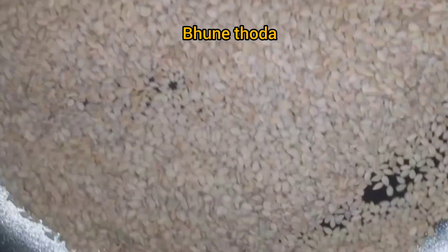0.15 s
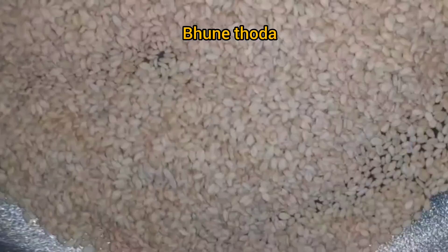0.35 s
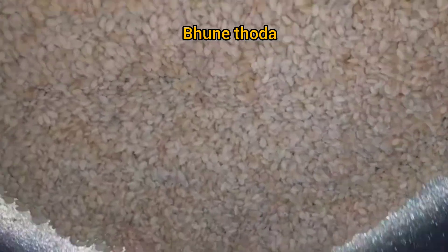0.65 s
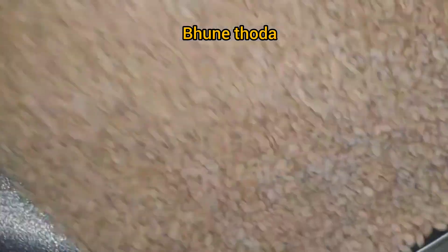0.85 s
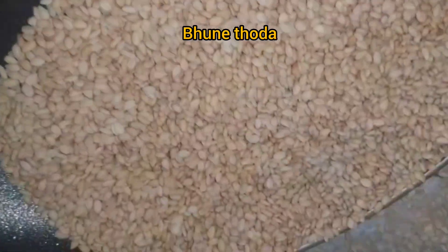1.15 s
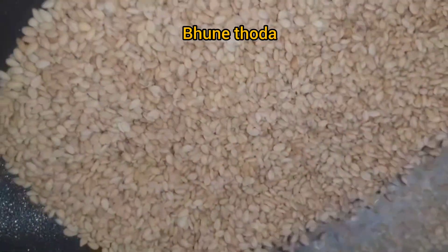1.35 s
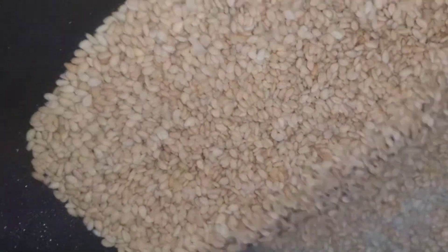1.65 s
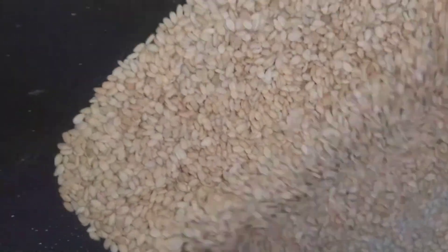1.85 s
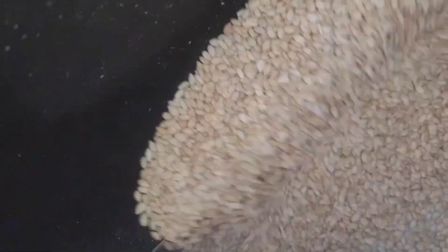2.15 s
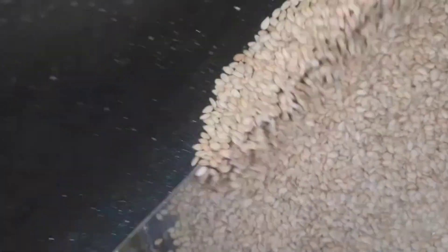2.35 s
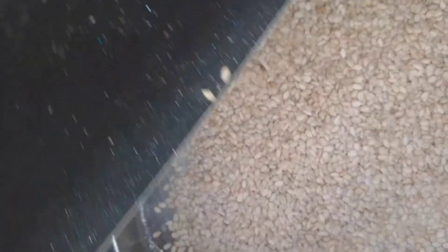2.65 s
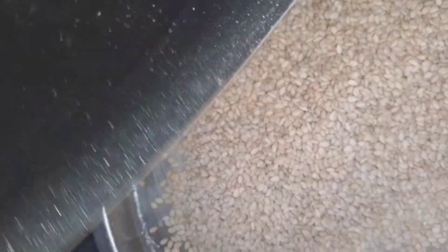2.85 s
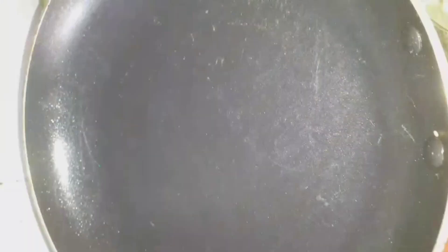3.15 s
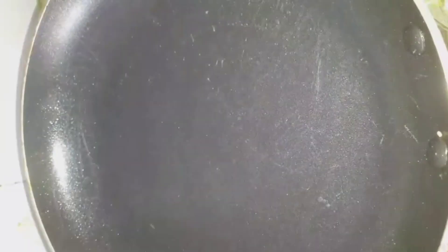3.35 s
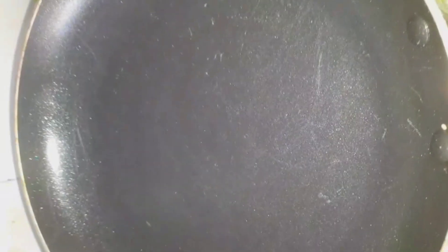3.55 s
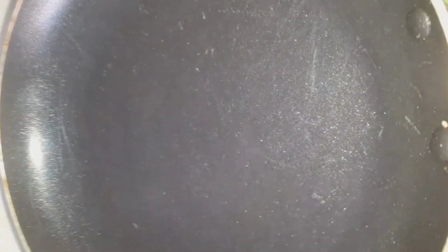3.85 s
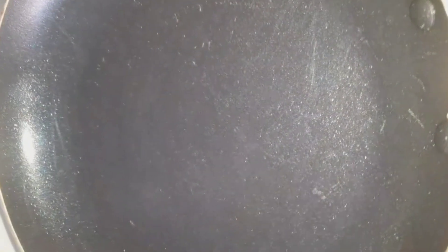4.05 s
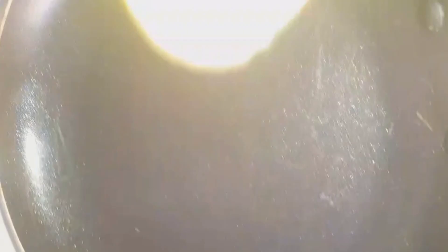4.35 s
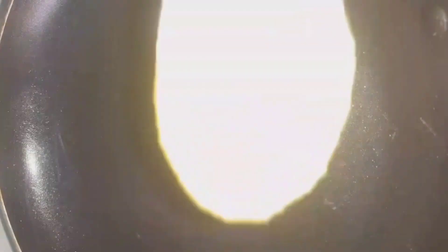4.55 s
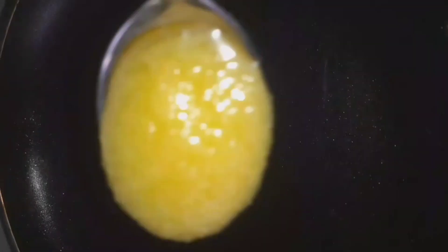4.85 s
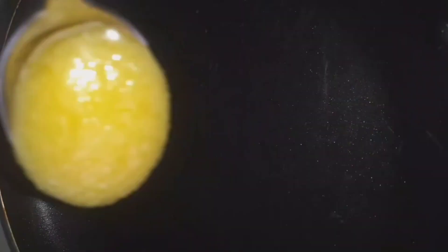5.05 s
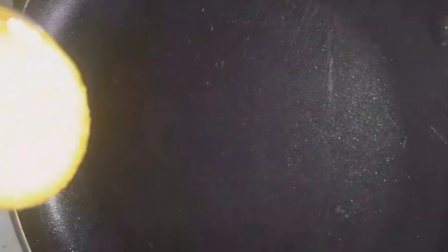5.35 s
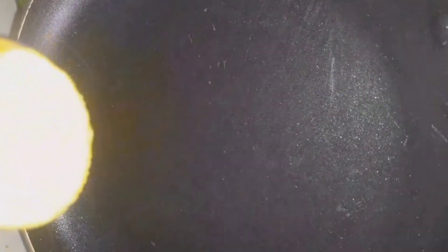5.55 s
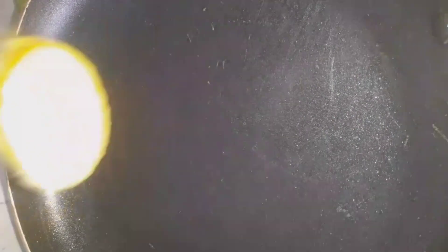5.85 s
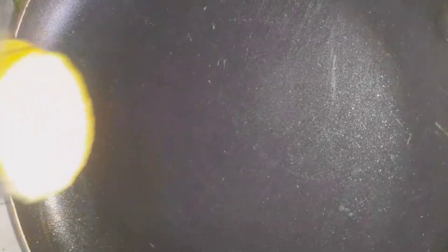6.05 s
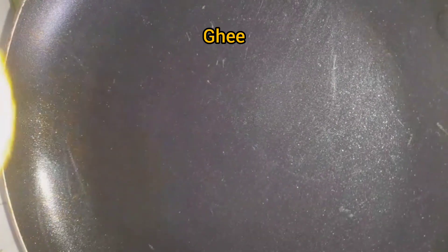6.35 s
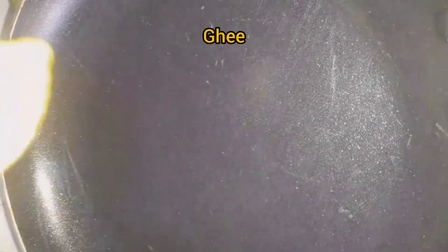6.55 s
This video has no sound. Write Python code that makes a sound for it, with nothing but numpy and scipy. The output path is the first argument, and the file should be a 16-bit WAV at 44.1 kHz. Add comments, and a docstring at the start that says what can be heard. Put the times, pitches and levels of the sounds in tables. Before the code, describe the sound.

Seeds pour from a faintly ringing pan onto a steel plate over a low electrical hum and fan that sink briefly and return.

```python
"""A kitchen appliance hums at twice mains frequency, fan rushing; it sinks for about a second and returns.
Roasted sesame seeds creep across a tilted frying pan, making it sing, then pour in two waves onto a
steel plate. All sound cuts out briefly at 3.1 s and resumes with a click; after this gap the fan drones
more and the hum is rougher. Underneath: room murmur, faint hiss and a few dry rustles."""
import sys
import numpy as np
from scipy.fft import rfft, irfft, next_fast_len
from scipy.io import wavfile
from scipy.ndimage import map_coordinates

SR = 44100
rng = np.random.default_rng(int(sys.argv[2]) if len(sys.argv) > 2 else 0)


def log_audio(samples):
    """Write samples as a 16-bit WAV file to the path given in sys.argv[1]."""
    # one column per channel
    frames = np.atleast_2d(samples).T
    # limit to full scale, then quantise
    limited = np.clip(frames, -1, 1)
    pcm = np.round(limited * 32767).astype(np.int16)
    wavfile.write(sys.argv[1], SR, pcm)


N = 296352

GAP_START_S, GAP_END_S = 3.123, 3.182  # suffix _A: before the gap, _B: after
START_S, SINK_S, RESTART_S = 0.002, 4.078, 5.475
HUM_HZ, TOP_HZ = 99.8, 15600

# background spectra (frequency [Hz], density [dB])
ROOM_SPECTRUM = [(30, -25), (70, -3.5), (130, -17.5), (166, 5.5), (200, -1), (300, -15), (360, -1),
                 (420, -8), (520, -15), (1000, -25), (2000, -48)]
HISS_A = [(1500, -16.5), (3000, -3.5), (4100, -2), (5200, -2), (6000, 6), (6800, 1.5), (8100, -2),
          (9000, -10.5), (10300, -24), (11900, -10.5), (13600, -21), (15500, -21.5)]
HISS_B = [(1000, -27), (1800, -8.5), (2600, -8), (4200, -1.5), (4750, -6), (5550, 2.5), (6150, 1),
          (6700, -7.5), (8000, -6.5), (9000, -14), (10000, -26.5), (13000, -21), (14200, -22), (15400, -14)]
RUSTLE_SPECTRUM = [(3000, -20), (8000, -1.5), (10000, -3.5), (13000, 0.5), (15500, -3.5)]
# appliance before the gap, after it, from mid-lull on
# (hum [dB], harmonic 2 trim [dB], harmonics 7+ trim [dB], rumble [dB], air [dB], whistle trim [dB])
STAGE_LEVELS = [(-25, -2, -3.5, -43.5, -62.5, -1), (-26, -5.5, -3.5, -45, -63, 5.5),
                (-25, 4, -0.5, -46, -62.5, -2)]
# casing harmonics before trims (multiple, level A [dB], level B [dB])
HARMONICS = [(2, -23, -18.5), (3, -24.5, -23), (4, -36, -34), (5, -39, -35), (7, -36.5, -38.5),
             (9, -49, -44.5), (10, -44.5, -59.5), (12, -46, -55.5), (14, -47, -41.5)]
# fan motor lines (frequency [Hz], level re hum [dB])
MOTOR_LINES = [(124, -17), (166.5, -27.5), (248, -26), (1240, -50)]
# hum dips (time [s], depth [dB])
HUM_DIPS = [(0.145, 7.6), (4.15, 8.8), (4.41, 10), (5.62, 12)]
# fan spectra (frequency [Hz], density [dB])
RUMBLE_A = [(25, -20.5), (60, -11), (100, 3), (170, -1.5), (240, -2.5), (315, 4), (400, -6), (520, -15),
            (800, -24.5), (1500, -62)]
RUMBLE_B = [(25, -22.5), (60, -11), (110, 1), (175, 6.5), (240, -3.5), (350, -6.5), (450, -14),
            (600, -21.5), (800, -36), (1500, -55.5)]
AIR_A = [(350, -43.5), (600, -8), (704, -7), (783, -7), (1950, -7), (2640, -8), (3240, -19.5), (3800, -18),
         (4380, -27.5), (5000, -44), (6500, -69.5), (11000, -120)]
AIR_B = [(350, -26.5), (600, 0.5), (698, -2.5), (946, -3.5), (1150, -5.5), (1250, -4.5), (2020, -6.5),
         (2800, -5), (3440, -10.5), (4700, -11.5), (5660, -7.5), (6950, -17), (8000, -16.5), (10400, -47.5),
         (17600, -120)]
# vent whistles (frequency [Hz], width [Hz], level [dB])
VENTS_A = [(1670, 250, -1), (5800, 260, -8), (6070, 120, -0.5)]
VENTS_B = [(1244, 60, 4.5), (2380, 130, -3), (2760, 270, -3), (3150, 60, -1.5), (3243, 50, -2),
           (5560, 90, -5)]
# draught from the lull on (time [s], relative level [dB])
DRAUGHT_CURVE = [(4.35, -68), (4.806, -75), (5.172, -74), (5.33, -64), (5.46, -65)]
# air puffs (time [s], level [dB])
PUFF_EVENTS = [(0.036, -45.5), (5.5, -46.5)]
# spectra of puffs and landing seeds (frequency [Hz], density [dB])
PUFF_SPECTRUM = [(300, -18.5), (1200, -4.5), (1700, -1), (2200, -2.5), (2700, -20), (6000, -32.5),
                 (10000, -66)]
PATTER_SPECTRUM = [(880, -35), (1500, -23.5), (2200, -8.5), (3150, -3.5), (4480, -0.5), (4900, -0.5),
                   (5950, 0.5), (6600, -1), (8050, -1), (9000, -9.5), (10100, -19.5), (11200, -16.5),
                   (11800, -8.5), (15500, -9)]
# resonances (frequency [Hz], width [Hz], level [dB])
PUFF_MODES = [(1714, 40, -2), (1996, 35, 0), (2116, 77, -4)]
THUMP_MODES = [(175, 78, 0), (428, 71, -12.5)]
PAN_MODES = [(1012, 39, -3), (1812, 30, -0.5), (2776, 59, -6.5), (3290, 51, -10.5), (4050, 38, -3),
             (4470, 46, 1), (5400, 32, -3.5), (5800, 65, -6), (6530, 64, -7.5), (7180, 52, -3.5),
             (7680, 55, -7), (8000, 48, -6), (8700, 33, -13.5), (11700, 75, -23), (12100, 70, -15),
             (13000, 70, -22)]
PAN_SLIDE_MODE = [(1876, 91, 0)]
PLATE_MODES = [(1826, 32, -12), (3110, 74, -6), (4480, 190, -1.5), (5240, 62, 2.5), (6040, 160, 1),
               (7240, 52, -1), (7900, 120, -2.5), (9200, 60, -22.5), (10530, 120, -11.5),
               (11700, 190, -10.5), (12600, 120, -5), (13200, 100, -9), (14800, 130, -7)]
# seed waves (time [s], flow [dB], rise [s], 20 dB decay [s], pan ring re flow [dB])
POUR_WAVES = [(0.965, -35, 0.019, 0.336, -33), (1.32, -39, 0.046, 1.0044, -17)]
# stray seed landings (time [s], relative level [dB])
LANDINGS = [(0.9677, -36), (0.9897, -26), (1.0173, -33), (1.2995, -31.5), (1.3394, -33.5)]
# rustles (time [s], level [dB], time constant [s])
RUSTLE_EVENTS = [(4.0, -73.5, 0.19), (4.3, -68.5, .04), (4.698, -80, .4), (5.866, -71.5, 0.18),
                 (6.45, -79, .35)]

TIME_S = np.arange(N) / SR


def amp(db):
    """dB to gain."""
    return 10 ** (np.asarray(db) / 20)


def unit(x):
    """Scale to rms 1."""
    return x / np.sqrt(np.mean(x ** 2) + 1e-20)


def since(start_s):
    """Seconds since start_s, 0 before."""
    return np.maximum(TIME_S - start_s, 0)


def rise(start_s, length_s):
    """Smooth step, 0 to 1."""
    return np.sin(np.pi / 2 * np.minimum(since(start_s) / length_s, 1)) ** 2


def at_gap(before, after):
    """Switch values at the gap."""
    return np.where(TIME_S < GAP_START_S, before, after)


def wobble(rate_hz):
    """Smooth random curve."""
    return map_coordinates(rng.standard_normal(int(N * rate_hz / SR) + 4), [TIME_S * rate_hz])


def filtered(x, response):
    """Apply a frequency response."""
    size = next_fast_len(N + SR // 2)
    return irfft(rfft(x, size) * response(np.fft.rfftfreq(size, 1 / SR)), size)[:N]


def coloured(x, spectrum):
    """Shape x on a log frequency axis, rms 1."""
    knots_hz, db = np.transpose(spectrum)
    return unit(filtered(x, lambda hz: amp(np.interp(np.log(hz + 1), np.log(knots_hz + 1), db))))


def noise(spectrum):
    """Coloured noise, rms 1."""
    return coloured(rng.standard_normal(N), spectrum)


def tone(hz, drift_rad, flutter_db, rate_hz):
    """Sine wavering in phase and level, rms 1."""
    phase = 2 * np.pi * (hz * TIME_S + rng.random()) + drift_rad * wobble(rate_hz)
    return unit(np.sin(phase) * amp(flutter_db * wobble(rate_hz)))


def impacts(rate_hz, spread_db):
    """Random impulses of uneven size, rms 1."""
    hits = rng.random(N) < rate_hz / SR
    return unit(hits * rng.choice([-1, 1], N) * amp(spread_db * rng.standard_normal(N)))


def bandpass(hz, centre_hz, width_hz):
    """Complex response of one mode."""
    return 1j * hz * width_hz / (centre_hz ** 2 - hz ** 2 + 1j * hz * width_hz)


def ringing(force, modes):
    """Modal response to a force, rms 1."""
    return unit(filtered(force, lambda hz: sum(amp(db) * bandpass(hz, *band) for *band, db in modes)))


def noise_bands(modes):
    """Noise through steep resonances, rms 1."""
    def response(hz):
        return sum(amp(db) * np.abs(bandpass(hz, *band)) ** 2 for *band, db in modes)
    return unit(filtered(rng.standard_normal(N), response))


def walls(x, ripple_db=2.04, spacing_hz=23.95):
    """Nearby reflections ripple the spectrum."""
    knots = rng.standard_normal(int(SR / spacing_hz) + 4)
    return filtered(x, lambda hz: unit(amp(ripple_db * map_coordinates(knots, [hz / spacing_hz]))))


def stage_db():
    """STAGE_LEVELS columns, per sample."""
    row = (TIME_S >= GAP_START_S).astype(int) + (TIME_S >= (SINK_S + RESTART_S) / 2)
    return np.transpose(STAGE_LEVELS)[:, row]


def running(rise_s, fall_db_per_s, lead_s=0):
    """Appliance gain: start, hold, sink, restart."""
    first_run = rise(START_S, rise_s) * amp(-fall_db_per_s * since(SINK_S))
    return first_run + rise(RESTART_S - lead_s, rise_s)


def hiss():
    """Faint hiss; changes colour at the gap."""
    return amp(-60) * at_gap(noise(HISS_A), noise(HISS_B))


def room():
    """Low, steady room murmur."""
    return amp(-59.5) * noise(ROOM_SPECTRUM)


def hum_gain(steady_db, beat_hz=6.73, beat_null_s=4.75, dip_width_s=0.023):
    """Slow build, brief dips, faint beating remnant in the lull."""
    full = amp(steady_db) * running(rise_s=0.42, fall_db_per_s=71, lead_s=0.061)
    beat = amp(-58.5) * np.exp(2j * np.pi * beat_hz * (TIME_S - beat_null_s))
    remnant = (TIME_S > SINK_S) * np.abs(amp(-39.5 - 19 * since(SINK_S)) - beat)
    dip_db = sum(db * np.exp(-((TIME_S - at_s) / dip_width_s) ** 2) for at_s, db in HUM_DIPS)
    return np.hypot(full, remnant) * amp(-dip_db)


def hum():
    """Magnetic force shakes the casing twice per mains cycle; loose panels buzz, the fan motor drones."""
    steady_db, octave_db, upper_db, *_ = stage_db()
    upper_db = upper_db + at_gap(6 * rise(start_s=1.72, length_s=0.97), 0)
    fundamental = tone(HUM_HZ, drift_rad=0.038, flutter_db=at_gap(0.61, 0.41), rate_hz=8.1)
    buzz = 0
    for k, a_db, b_db in HARMONICS:
        level_db = at_gap(a_db, b_db) + (k == 2) * octave_db + (k >= 7) * upper_db
        buzz += amp(level_db) * tone(k * HUM_HZ, drift_rad=0.12, flutter_db=1, rate_hz=7)
    drone = sum(amp(db) * tone(hz, drift_rad=0.4, flutter_db=2.5, rate_hz=6) for hz, db in MOTOR_LINES)
    return hum_gain(steady_db) * (fundamental + buzz + at_gap(0, drone))


def fan():
    """Turbulent air rumbles in the housing and rushes, faintly whistling, out of the vents."""
    *_, rumble_db, air_db, whistle_db = stage_db()
    blowing = running(rise_s=0.032, fall_db_per_s=66)
    draught = (TIME_S > SINK_S) * amp(np.interp(TIME_S, *np.transpose(DRAUGHT_CURVE)) - 8)
    rumble = at_gap(amp(1.3) * noise(RUMBLE_A), amp(5.5) * noise(RUMBLE_B))
    air = at_gap(amp(5.5) * noise(AIR_A), amp(8.5) * noise(AIR_B))
    whistle = amp(whistle_db) * at_gap(noise_bands(VENTS_A), noise_bands(VENTS_B))
    rumble_gain = np.hypot(blowing * amp(rumble_db + 0.9 * wobble(8.1)), draught * amp(9))
    air_gain = blowing * amp(air_db + 0.35 * wobble(5))
    vents = np.hypot(air_gain, draught) * air + air_gain * amp(wobble(7)) * whistle
    return rumble_gain * rumble + walls(vents)


def puffs(rise_s=0.012, t60_s=0.64):
    """Faintly ringing air puff and dull thump as the hum swells."""
    envelope = np.zeros(N)
    for at_s, db in PUFF_EVENTS:
        age_s = since(at_s)
        envelope += amp(db - 60 * age_s / t60_s) * (1 - np.exp(-age_s / rise_s))
    air = amp(-1) * noise(PUFF_SPECTRUM)
    ring = amp(-6) * ringing(rng.standard_normal(N), PUFF_MODES)
    thump = amp(at_gap(2, 9.8)) * noise_bands(THUMP_MODES)
    return envelope * (air + ring + thump)


def seed_creep(peak_s=0.864, rise_db_per_s=43, fall_db_per_s=85):
    """Seeds rub the pan until it sings; faster sliding stirs higher modes."""
    offset_s = TIME_S - peak_s
    level_db = -40.5 + np.minimum(rise_db_per_s * offset_s, -fall_db_per_s * offset_s)
    rub = impacts(rate_hz=5000, spread_db=3)
    dull_rub = amp(-0.5) * coloured(rub, [(1000, -1), (2000, -2.5), (5000, -9), (12000, -28.5)])
    speed = np.clip((TIME_S - 0.55) / 0.18, 0, 1)
    return amp(level_db + 1.4 * wobble(35)) * ringing(speed * rub + dull_rub, PAN_MODES)


def seed_pour(trickle_db_per_s=51.5):
    """A trickle, then two waves patter on plate and heap; seeds still sliding ring the pan."""
    lead_s = POUR_WAVES[0][0] - TIME_S
    flow = (lead_s > 0) * amp(-48.5 - trickle_db_per_s * np.abs(lead_s))
    ring_gain = 0
    for at_s, db, rise_s, decay_s, ring_db in POUR_WAVES:
        onset = amp(db) * (1 - np.exp(-since(at_s) / rise_s))
        thinning_db = -20 * (since(at_s) / decay_s) ** 1.75
        flow += onset * amp(thinning_db)
        ring_gain += onset * amp(ring_db + 0.49 * thinning_db)  # outlasts the flow
    heap = amp(-2.5) * coloured(impacts(rate_hz=3500, spread_db=3), PATTER_SPECTRUM)
    plate = amp(-6) * ringing(impacts(rate_hz=4000, spread_db=4), PLATE_MODES)
    pan = ring_gain * ringing(rng.standard_normal(N), PAN_SLIDE_MODE)
    return pan + flow * amp(wobble(60)) * walls(heap + plate)


def seed_ticks(t60_s=0.07):
    """Stray seeds and clumps hit the steel."""
    envelope = sum((TIME_S >= at_s) * amp(db - 12 - 60 * since(at_s) / t60_s) for at_s, db in LANDINGS)
    return envelope * noise(PATTER_SPECTRUM)


def click(t60_s=0.0035):
    """Noise burst ending the gap."""
    return (TIME_S >= GAP_END_S) * amp(-35.5 - 60 * since(GAP_END_S) / t60_s) * rng.standard_normal(N)


def rustles():
    """Faint, dry treble swells."""
    envelope = sum(amp(db) * np.exp(-np.abs(TIME_S - at_s) / tau_s) for at_s, db, tau_s in RUSTLE_EVENTS)
    return envelope * noise(RUSTLE_SPECTRUM)


def scene():
    """Appliance and seeds over the background, mono."""
    steady_hiss, murmur = hiss(), room()
    appliance = hum() + fan() + puffs()
    seeds = seed_creep() + seed_pour() + seed_ticks()
    return (appliance + seeds + walls(rustles() + steady_hiss) + murmur)[None]


def record(dry):
    """Mute the gap, add the click, band-limit."""
    gate = np.clip((GAP_START_S - TIME_S) / 0.0006, 0, 1) + (TIME_S >= GAP_END_S)
    return filtered(dry[0] * gate + click(), lambda hz: hz < TOP_HZ)[None]


dry = scene()
out = record(dry)
log_audio(out)
```